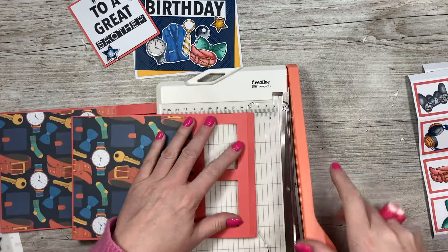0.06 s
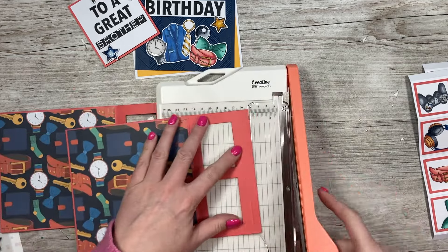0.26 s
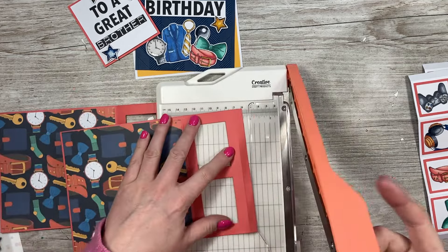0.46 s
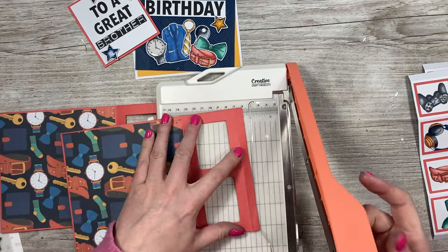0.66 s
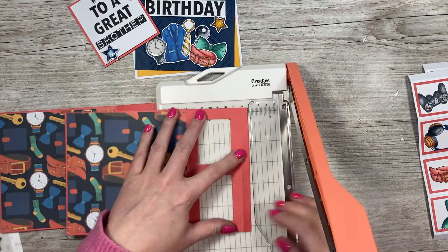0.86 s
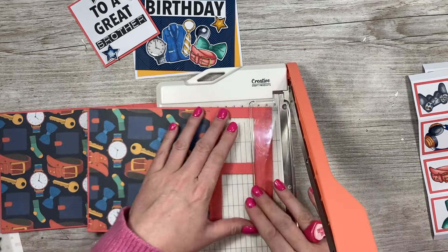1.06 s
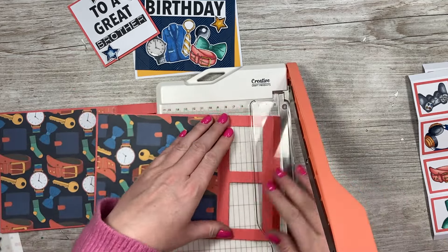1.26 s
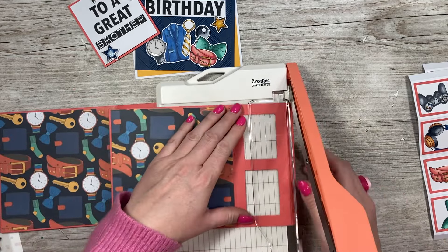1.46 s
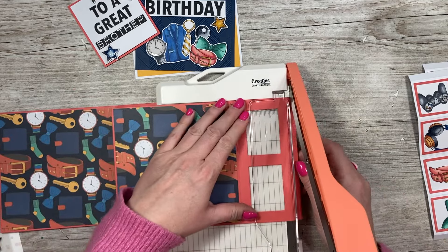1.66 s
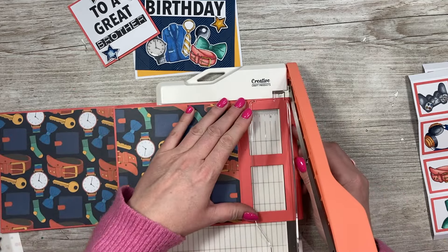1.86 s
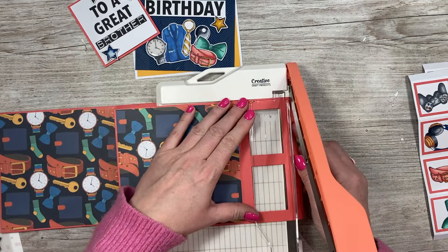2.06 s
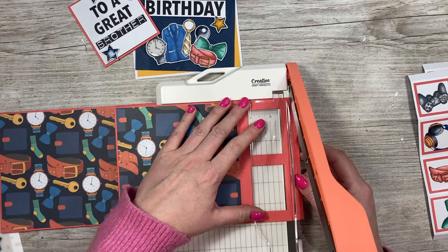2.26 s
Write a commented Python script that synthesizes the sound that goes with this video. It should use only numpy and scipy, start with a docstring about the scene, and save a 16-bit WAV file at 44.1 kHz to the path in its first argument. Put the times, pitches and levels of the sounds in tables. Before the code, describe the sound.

A lever paper trimmer is handled close to the microphone: a small click, a short groan of the rising arm, thuds and a loud sharp clack, then card shuffles and ticks over the bed in a quiet small room.

```python
"""A lever paper trimmer on a craft table, close to the microphone in a small quiet room.
The blade arm is lifted: its pivot groans in gliding tones over rubbing noise, while decaying low modes
make the plastic base knock and thud. Hard parts click and ping in short bursts of high modes.
Card is nudged and slid over the bed in short strokes of grainy noise, with noise-burst ticks and
brief tonal judders as it is lined up. Quick echoes, a diffuse tail and a faint hush make the room."""
import sys
import numpy as np
from scipy import signal
from scipy.fft import rfft, irfft, next_fast_len
from scipy.io import wavfile
from scipy.ndimage import uniform_filter1d, map_coordinates

SR = 44100
rng = np.random.default_rng(int(sys.argv[2]) if len(sys.argv) > 2 else 0)


def digitize_waveform(pressure):
    """Quantize a signal to 16-bit integers and store it at the path in sys.argv[1].

    Rows of a 2-D input are taken as channels; values are limited to [-1, 1].
    """
    field = np.atleast_2d(pressure).T
    bounded = np.clip(field, -1, 1)
    quanta = np.round(bounded * 32767).astype(np.int16)
    wavfile.write(sys.argv[1], SR, quanta)


N = 101429


def amp(db):
    """Decibels to gain."""
    return 10 ** (np.asarray(db) / 20)


def unit(x):
    """Scale to rms 1."""
    return x / np.sqrt(np.mean(x ** 2) + 1e-20)


def along(points, hz):
    """Read (f/Hz, value) points on a log-frequency axis."""
    f, v = np.transpose(points)
    return np.interp(np.log(hz + 1), np.log(f + 1), v)


def clock():
    """Time of each sample in seconds."""
    return np.arange(N) / SR


def curves(rows):
    """One value per sample for each column after the time."""
    s, *cols = np.transpose(rows)
    return [np.interp(clock(), s, c) for c in cols]


def wobble(rate):
    """A smooth random curve, rate knots a second."""
    return map_coordinates(rng.standard_normal(N // 8), [clock() * rate], mode="mirror")


def filtered(x, response):
    """x times a response of frequency."""
    m = next_fast_len(N + SR // 2)
    return irfft(rfft(x, m) * response(np.fft.rfftfreq(m, 1 / SR)), m)[..., :N]


def coloured(x, colour, tilt=0):
    """x with a spectrum and a tilt in dB per octave about 1 kHz (level below 100 Hz), at rms 1."""
    def response(hz):
        octaves = np.log2(np.maximum(hz, 100) / 1000)
        return amp(along(colour, hz) + tilt * octaves)
    return unit(filtered(x, response))


def noise(colour):
    """Coloured noise of rms 1."""
    return coloured(rng.standard_normal(N), colour)


def add(track, s, sound):
    """Mix a sound in at time s."""
    i = max(round(s * SR), 0)
    track[i:i + len(sound)] += sound[:N - i]


def smoothed(x, bins, frames):
    """Average a spectrogram over neighbouring bins and frames."""
    return uniform_filter1d(uniform_filter1d(x, size=bins, axis=0), size=frames, axis=1)


PATCHY_DB = 3  # rms depth of the shifting colour


def patchy(x):
    """The colour shifts as the contact moves: random patches of gain in time and frequency."""
    z = signal.stft(x, nperseg=1024)[2]
    field = smoothed(rng.standard_normal(z.shape), 6, 4)
    return signal.istft(z * amp(PATCHY_DB * unit(field)), nperseg=1024)[1][:N]


FIBRES_PER_S, FIBRE_SHARE = 1100, 0.23  # average catches a second, their share of the power


def friction():
    """Fibres catching at random over a smooth hiss."""
    catches = unit((rng.random(N) < FIBRES_PER_S / SR) * rng.standard_normal(N))
    hiss = rng.standard_normal(N)
    return patchy(np.sqrt(FIBRE_SHARE) * catches + np.sqrt(1 - FIBRE_SHARE) * hiss)


# the bed's ringing under the card: f/Hz, width/Hz, lift/dB
BED_RESONANCES = [(1160, 16, 13), (1328, 21, 6), (1844, 30, 3), (2070, 79, 1.5), (2980, 300, 3.5),
                  (4954, 390, 6.5)]


def ringing(hz):
    """Gain of the bed's narrow resonances."""
    return 1 + sum((amp(db) - 1) / (1 + 2j * (hz - f) / width) for f, width, db in BED_RESONANCES)


CRACKLE_PER_S, CRACKLE_T60 = 300, .004  # typical rate of an uneven series; decay of each rasp in s


def crackle():
    """The card's edge catches in short rasps at uneven intervals."""
    t = np.arange(SR // 50) / SR
    count = np.cumsum(CRACKLE_PER_S * np.exp(wobble(200))) / SR
    catches = np.diff(np.floor(count), prepend=0)
    rasps = signal.fftconvolve(catches * rng.uniform(.3, 1, N), amp(-60 * t / CRACKLE_T60))[:N]
    return filtered(rasps * rng.standard_normal(N), ringing)


# card sliding on the bed: t/s, length/s, level/dB, tilt/(dB/octave), bed drumming relative to stroke/dB
STROKES = [(0.091, 0.14, -67.5, 5, -6), (0.616, 0.026, -59, 8.5, -8), (0.815, 0.15, -59.5, 7.5, -23),
           (0.942, 0.018, -52.5, -6.5, -1.5), (1.007, 0.079, -59.5, 0, -6.5), (1.093, 0.029, -47, 2, 3.5),
           (1.189, 0.057, -64.5, 1.5, 11), (1.225, 0.034, -42.5, -2, -4.5), (1.26, 0.045, -48, 0, 3),
           (1.307, 0.062, -41.5, 1, -9.5), (1.377, 0.048, -49, 3, 3), (1.417, 0.026, -43.5, -2.5, -4),
           (1.451, 0.029, -42, 2.5, -8), (1.483, 0.025, -50.5, 3, -0.5), (1.529, 0.049, -53.5, -1, 2),
           (1.567, 0.051, -51.5, -4.5, 1), (1.606, 0.13, -65.5, -7, 5), (1.763, 0.025, -61.5, 0, -5.5),
           (1.779, 0.041, -52.5, -3, -1.5), (1.841, 0.03, -70, -3, 8), (1.96, 0.056, -65, -2.5, 8.5),
           (1.984, 0.017, -59.5, 0, 0), (2.03, 0.027, -73, 0, -2)]
# hiss of the sheet: f/Hz, level/dB
CARD_COLOUR = [(200, -20.5), (700, -5.5), (950, -15), (1170, 0.5), (1500, -1.5), (2200, 2.5), (3000, 2),
               (4200, -3.5), (5500, -12.5), (7200, -2.5), (11000, -7.5), (13000, -12), (16000, -22)]
# the card's cut edge catching: f/Hz, level/dB
CRACKLE_COLOUR = [(300, -15.5), (650, -2), (900, -9), (1300, 3.5), (2800, -2), (5000, -3), (16000, -26.5)]
# hollow drumming of the bed: f/Hz, level/dB
BED_COLOUR = [(30, -17), (100, -3), (190, 7), (280, -2), (400, -3.5), (500, 4.5), (670, 1), (880, -11.5),
              (2000, -40), (8000, -70.5)]
STROKE_RISE_S, STROKE_FALL_S = 0.0019, 0.012  # time constants
CARD_SIDE_DB, CRACKLE_DB, STROKE_FLUTTER_DB = -18.5, -5, 1.5


def slides():
    """Each push of the card hisses across the width of the sheet and makes the hollow bed drum."""
    out, t = np.zeros((2, N)), clock()
    # the wide sheet radiates differently towards each port
    side = friction() * np.array([[1], [-1]])
    grain = filtered(friction() + amp(CARD_SIDE_DB) * side, ringing)
    bed, edge = noise(BED_COLOUR), crackle()
    for s, length, db, tilt, bed_db in STROKES:
        rise = 1 - np.exp(-np.maximum(t - s, 0) / STROKE_RISE_S)
        fall = np.exp(-np.maximum(t - s - length, 0) / STROKE_FALL_S)
        rub = coloured(grain, CARD_COLOUR, tilt)
        rasp = amp(CRACKLE_DB) * coloured(edge, CRACKLE_COLOUR, tilt)
        out += amp(db) * rise * fall * (rub + rasp + amp(bed_db) * bed)
    return out * amp(STROKE_FLUTTER_DB * wobble(110))


# hard clicks of the arm and guard: t/s, level/dB, tilt/(dB/octave)
CLICKS = [(0.1105, -22.5, -2.5), (0.696, -35, -11), (0.707, -42.5, -6.5), (.735, -47, 0.5),
          (0.742, -30.5, -3.5), (0.791, -27, -1.5), (0.7973, -16.5, 0.5), (0.799, -3.5, -0.5),
          (1.213, -45, 0.5), (1.236, -13, 10)]
# modes of the plastic guard: f/Hz, level/dB
GUARD = [(2800, -12.5), (5450, 0.5), (7250, 0), (11000, -11), (15300, -15.5)]
# the chattering ring: f/Hz, level/dB
CLICK_COLOUR = [(100, -31.5), (700, -16.5), (1600, -11.5), (2700, -11), (4200, -10.5), (5200, -1),
                (6300, -13.5), (7200, -6.5), (8500, -1), (11000, -9.5), (16000, -22.5)]
CLICK_RISE_S, CLICK_T60, CLICK_RING_T60 = 0.00028, 0.0027, 0.031  # s
CLICK_RING_DB, CHATTER_DB, CHATTER_PER_S = -19.5, 4, 450


def clicks():
    """Hard contacts: one tight crack of the guard's modes, then a weak chattering ring."""
    out, t = np.zeros(N), np.arange(SR // 8) / SR
    for s, db, tilt in CLICKS:
        crack = np.zeros(len(t))
        for k, (hz, level) in enumerate(GUARD):
            mode_db = level + tilt * np.log2(hz / GUARD[2][0])
            crack += amp(mode_db - 60 * t / CLICK_T60) * (-1) ** k * np.sin(2 * np.pi * hz * t)
        chatter = amp(CHATTER_DB * wobble(CHATTER_PER_S))
        ring = (coloured(rng.standard_normal(N), CLICK_COLOUR, tilt) * chatter)[:len(t)]
        ring *= amp(CLICK_RING_DB - 60 * t / CLICK_RING_T60)
        add(out, s, amp(db) * (crack + ring) * (1 - np.exp(-t / CLICK_RISE_S)))
    return out


# soft blows on the base: t/s, level/dB, tilt/(dB/octave)
KNOCKS = [(0.112, -50, 5), (0.218, -40, -4), (0.43, -37, 11), (0.464, -44, -12), (0.4927, -22, 1.5),
          (0.5564, -27.5, 4), (.572, -37, 5), (.627, -51, -16.5), (0.7347, -38, 5.5), (.802, -36.5, 1.5),
          (0.893, -36, 3.5), (0.919, -45.5, -7), (.948, -35.5, 3.5), (0.975, -40, 2.5), (1.096, -35, 7),
          (1.131, -34, 1), (1.203, -42.5, -8.5), (1.235, -33.5, 8.5), (1.314, -48, 10.5), (1.422, -29, 1),
          (1.51, -37, -2.5), (1.688, -56, -14.5), (1.811, -43, 1.5), (1.969, -47.5, 4.5),
          (2.014, -43.5, -3.5)]
# nominal modes of the base on the table: f/Hz, level/dB, t60/s
BASE = [(73.6, -16, 0.18), (113.2, -3, 0.13), (172, -4, 0.059), (200.7, -4, .12), (281, -7.5, 0.026),
        (358.6, -9.5, 0.099), (524, -10, 0.042), (653.5, -15.5, 0.1)]
# dull rattle of each blow: f/Hz, level/dB
RATTLE_COLOUR = [(30, -29.5), (90, 2.5), (220, -2), (660, -7), (900, -21), (1050, -8), (1300, -26.5),
                 (2000, -34), (8000, -47)]
KNOCK_SAG, KNOCK_SAG_S = 0.16, 0.005  # modes start this fraction sharp under the blow, then relax
KNOCK_RISE_CYCLES = 0.65  # time constant of each mode's swell
KNOCK_RISE_S, RATTLE_DB, RATTLE_T60 = 0.001, -6.5, 0.13  # the rattle's rise, level and decay in s
KNOCK_TOP_HZ = 840  # the blows are soft: little rings above this


def knocks():
    """Each blow rings the base's low modes, sinking in pitch, with a short dull rattle."""
    out, t = np.zeros(N), np.arange(SR // 3) / SR
    rattle = noise(RATTLE_COLOUR)
    relaxed = t + KNOCK_SAG * KNOCK_SAG_S * (1 - np.exp(-t / KNOCK_SAG_S))
    for s, db, tilt in KNOCKS:
        ring = np.zeros(len(t))
        for k, (hz, level, t60) in enumerate(BASE):
            # every blow varies the modes a little in level and pitch
            mode_db = level + tilt * np.log2(hz / BASE[3][0]) + rng.normal(0, 1)
            swell = 1 - np.exp(-t * hz / KNOCK_RISE_CYCLES)
            tone = np.sin(2 * np.pi * hz * (1 + rng.normal(0, 0.016)) * relaxed)
            ring += amp(mode_db - 60 * t / t60) * swell * (-1) ** k * tone
        shake = np.roll(rattle, -round(s * SR))[:len(t)]
        shake = shake * amp(RATTLE_DB - 60 * t / RATTLE_T60) * (1 - np.exp(-t / KNOCK_RISE_S))
        add(out, s, amp(db) * (ring + shake))
    return signal.sosfilt(signal.butter(4, KNOCK_TOP_HZ, fs=SR, output="sos"), out)


# the pivot's stick-slip, a long groan and then a higher one: t/s, centre f/Hz, level/dB
PIVOT = [
    [(.214, 484.5, -62.5), (.231, 479, -38), (.248, 561.5, -48.5), (.278, 540.2, -33.5),
     (.318, 557.5, -43.5), (.338, 547, -34), (.356, 617, -37), (.378, 543.4, -27.5), (.393, 530, -50),
     (.41, 530, -37.5), (.425, 500, -59)],
    [(.365, 616, -58.5), (.394, 684.5, -35), (.412, 708.3, -44), (.455, 650, -50), (.485, 651, -74.5)],
]
# dry rubbing in the pivot: t/s, level/dB
RUB = [(.21, -78.5), (.224, -43), (.3, -37), (.35, -39), (.395, -40.5), (.45, -50), (.49, -47),
       (.53, -74.5)]
# tone of the rubbing: f/Hz, level/dB
RUB_COLOUR = [(30, -22), (110, -7.5), (320, -1.5), (430, -3), (680, -1.5), (880, -16.5), (1100, -14.5),
              (1700, -15.5), (3000, -23.5), (5000, -25), (7200, -24.5), (11000, -32.5), (16000, -38.5)]
GROAN_WAVER_HZ, GROAN_FLUTTER_DB, OVERTONE_DB = 14, 2.4, -20


def pivot():
    """The rising arm groans on a gliding pitch over dry rubbing."""
    t, groan = clock(), np.zeros(N)
    for glide in PIVOT:
        hz, effort_db = curves(glide)
        phase = 2 * np.pi * np.cumsum(hz + GROAN_WAVER_HZ * wobble(160)) / SR
        tone = unit(np.sin(phase) + amp(OVERTONE_DB) * np.sin(2 * phase))
        sounding = (t > glide[0][0]) * (t < glide[-1][0])
        groan += tone * amp(effort_db + GROAN_FLUTTER_DB * wobble(120)) * sounding
    rub_db, = curves(RUB)
    rubbing = (t > RUB[0][0]) * (t < RUB[-1][0])
    return groan + coloured(friction(), RUB_COLOUR) * amp(rub_db) * rubbing


# stiff card edges tapping the bed and its stop: t/s, level/dB, tilt/(dB/octave)
TICKS = [(.3886, -28.5, -6.5), (.606, -51, 7.5), (.659, -45, 4), (.699, -43.5, 7), (.8018, -33, -2.5),
         (.895, -34.5, -5.5), (1.0995, -34, -3), (1.109, -36.5, -4), (1.2298, -30, 4), (1.2368, -24.5, -1),
         (1.2985, -35, -4.5), (1.431, -33, 1.5), (1.439, -38.5, 2), (1.466, -34, 6), (1.612, -34, -1),
         (1.704, -55, -3.5), (1.726, -51, 0.5), (1.783, -47.5, -1), (1.795, -41, -1), (1.966, -55, 8),
         (1.993, -41.5, 1)]
# tone of the taps: f/Hz, level/dB
TICK_COLOUR = [(100, -2), (600, 15.5), (900, -20), (1200, -4), (2200, 10.5), (3500, 2), (6000, -2),
               (11000, -17.5), (16000, -29)]
TICK_T60, TICK_RING_DB, TICK_RING_T60 = 0.017, -17.5, 0.13  # decays in s


def ticks():
    """Hard contacts: a brief crack, then a weaker ring of many dense modes, both shaped from noise."""
    out, t = np.zeros(N), np.arange(SR // 8) / SR
    decay = amp(-60 * t / TICK_T60) + amp(TICK_RING_DB - 60 * t / TICK_RING_T60)
    shape = decay * (1 - np.exp(-t / 0.00023))
    for s, db, tilt in TICKS:
        snap = coloured(rng.standard_normal(N), TICK_COLOUR, tilt)[:len(t)] * shape
        # give every tick the energy of its envelope
        add(out, s, amp(db) * snap * np.linalg.norm(shape) / np.linalg.norm(snap))
    return out


# the arm jolts the whole trimmer on its feet: t/s, settled f/Hz, level/dB, t60/s
THUDS = [(0.4933, 154.3, -20.5, .085), (0.558, 113.4, -24.5, .12), (0.592, 78.4, -45.5, .14),
         (0.741, 112, -35, 0.16), (1.13, 118, -32, .08)]
THUD_SHARP, THUD_SHARP_S = 0.98, 0.0057  # starts this fraction sharp and sinks as the feet give
THUD_RISE_CYCLES = .4  # time constant of the swell


def thuds():
    """One low, quickly damped bounce for each jolt."""
    out, t = np.zeros(N), np.arange(SR // 4) / SR
    relaxed = t + THUD_SHARP * THUD_SHARP_S * (1 - np.exp(-t / THUD_SHARP_S))
    for s, hz, db, t60 in THUDS:
        swell = 1 - np.exp(-t * hz / THUD_RISE_CYCLES)
        add(out, s, -amp(db - 60 * t / t60) * swell * np.sin(2 * np.pi * hz * relaxed))
    return out


# small metal parts of the hinge ping: t/s, f/Hz, level/dB
PINGS = [(.727, 3370, -49.5), (0.741, 3480, -41.5)]
PING_T60 = .022  # s


def pings():
    """One short-lived partial for each metal contact."""
    out, t = np.zeros(N), np.arange(SR // 8) / SR
    for s, hz, db in PINGS:
        add(out, s, amp(db - 60 * t / PING_T60) * np.sin(2 * np.pi * hz * t))
    return out


# the card sticks and slips: t/s, length/s, centre f/Hz, level/dB
JUDDERS = [(1.102, 0.015, 2214, -39.5), (1.09, 0.022, 1320, -50), (1.113, 0.01, 2960, -59),
           (1.313, 0.0084, 673, -37), (1.561, 0.011, 656.4, -37), (1.575, 0.05, 646, -48.5),
           (1.791, 0.012, 5030, -49.5), (1.808, 0.019, 741, -48.5), (1.972, 0.018, 628, -54)]


def judders():
    """Brief rough squeaks where the card sticks: tones of wavering pitch that swell and fade."""
    out, t = np.zeros(N), clock()
    waver = 1 + 0.034 * wobble(350)
    for s, length, hz, db in JUDDERS:
        swell = np.sin(np.pi * np.clip((t - s) / length, 0, 1))
        out += amp(db) * swell * unit(np.sin(2 * np.pi * hz * np.cumsum(waver) / SR))
    return out


# level of the room's hush: t/s, level/dB
HUSH = [(0, -68.5), (.15, -64), (1.0, -55), (1.85, -74), (1.92, -71.5), (2.13, -75.5)]
# tone of the hush: f/Hz, level/dB
FLOOR_COLOUR = [(25, -14.5), (60, -1.5), (120, -5), (300, -9.5), (1000, -18), (3200, -21.5), (7000, -21.5),
                (16000, -29.5)]


def hush():
    """Faint coloured noise, mostly shared by the ports, on a moving level."""
    side = noise(FLOOR_COLOUR) * np.array([[1], [-1]])
    return amp(curves(HUSH)[0]) * (noise(FLOOR_COLOUR) + amp(-9.0) * side)


EARLY_DB, EARLY_S = -12.5, .009  # level, longest delay


def nearby(x):
    """Weak quick echoes off the table and things on it, different at each port."""
    delays = rng.uniform(.1, 1, size=(2, 16)) * EARLY_S
    signs = rng.choice([-1, 1], size=(2, 16))
    echoes = np.zeros((2, N))
    for port in range(2):
        for delay, sign in zip(delays[port], signs[port]):
            echoes[port] += sign * np.pad(x, (round(delay * SR), 0))[:N]
    echoes /= np.sqrt(delays.shape[1])
    return amp(EARLY_DB) * filtered(echoes, lambda hz: 1j * hz / (700 + 1j * hz))  # high-pass


# decay of the room: f/Hz, t60/s
ROOM_T60 = [(100, 0.49), (500, 0.2), (3000, 0.27), (7000, 0.18), (14000, 0.057)]
ROOM_DB, ROOM_DELAY_S, ROOM_SIDE_DB = -14, .004, -1


def room(x):
    """A short diffuse tail of decaying noise, different at each port."""
    hz, t, z = signal.stft(rng.standard_normal((2, SR // 2)), SR, nperseg=256)
    decay = amp(-60 * t / along(ROOM_T60, hz)[:, None])
    mid, side = signal.istft(z * decay, SR, nperseg=256)[1]
    tail = mid + amp(ROOM_SIDE_DB) * side * np.array([[1], [-1]])
    late = np.pad(x, (round(ROOM_DELAY_S * SR), 0))
    wet = signal.fftconvolve(late[None], tail / np.linalg.norm(tail[0]), axes=1)[:, :N]
    return amp(ROOM_DB) * wet


def scene():
    """Trimmer and card, the room's answer and its faint hush."""
    card = slides() + ticks() + judders()
    trimmer = clicks() + knocks() + pivot() + thuds() + pings()
    near = card + trimmer
    centre = near.mean(axis=0)
    return near + nearby(centre) + room(centre) + hush()


SUPPRESS_DB, SUPPRESS_DEPTH_DB = -99.5, 13  # threshold per bin, deepest cut


def suppressed(x):
    """A noise suppressor turns down each band while it is faint."""
    z = signal.stft(x, nperseg=512)[2]
    power = abs(smoothed(np.mean(abs(z) ** 2, axis=0), 15, 3))
    faint = 1 / (1 + power / amp(SUPPRESS_DB) ** 2)
    return signal.istft(z * amp(-SUPPRESS_DEPTH_DB * faint), nperseg=512)[1][:, :N]


# phase by which the left port leads: f/Hz, lead/rad
PORT_PHASE = [(0, 0), (1000, .35), (4300, 1.1), (5600, 2.2), (6400, .5), (7700, -.3), (8500, -3),
              (9600, -3.25), (10300, -6), (12400, -6.5), (13100, -9.3), (14300, -9.5), (15000, -12.4),
              (16500, -12.4)]
# tone of both ports: f/Hz, level/dB
PORT_COLOUR = [(20, -12.5), (45, -7), (65, -3.5), (7800, -0.5), (8800, -4.5), (9400, -0.5), (10500, -0.5),
               (12400, -1), (13400, 2), (14300, -11.5), (15300, 0.5), (16500, -12)]
# left level minus right: f/Hz, level/dB
BALANCE_DB = [(60, -2.5), (250, 0.1), (500, 0.6), (1100, 4), (2200, 0.8), (12000, -0.25)]
MUTE_S, TOP_HZ = 2.133, 16500  # start of the closing silence, upper band limit


def record(dry):
    """The two ports colour the sound and differ in phase and level; it cuts to silence, band-limited."""
    half = np.array([[.5], [-.5]])  # each port takes half of a difference

    def response(hz):
        level_db = along(PORT_COLOUR, hz) + half * along(BALANCE_DB, hz)
        return np.exp(1j * half * along(PORT_PHASE, hz)) * amp(level_db)
    ports = filtered(dry, response)
    return filtered(suppressed(ports) * (clock() < MUTE_S), lambda hz: hz < TOP_HZ)


dry = scene()
out = record(dry)
digitize_waveform(out)
```